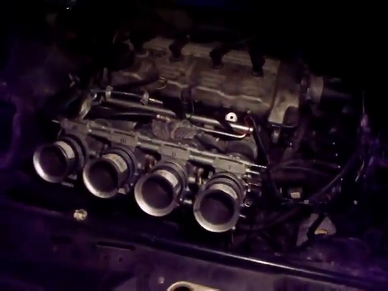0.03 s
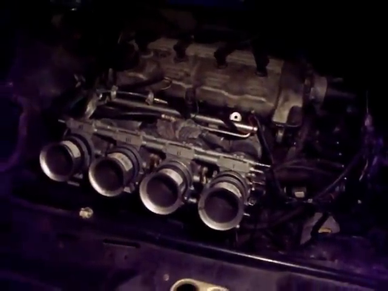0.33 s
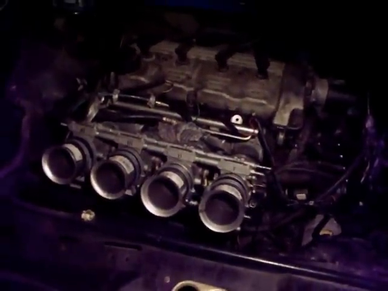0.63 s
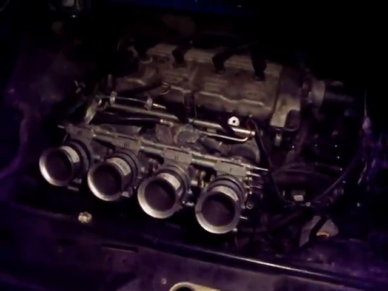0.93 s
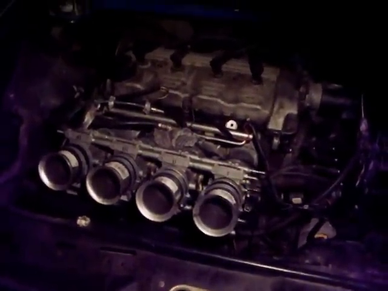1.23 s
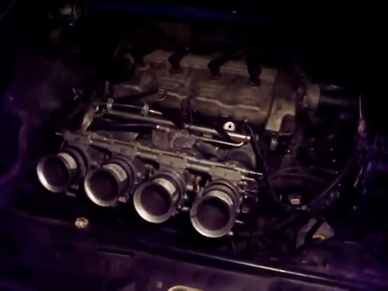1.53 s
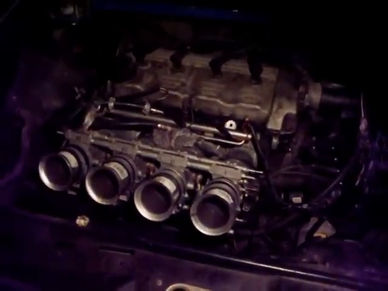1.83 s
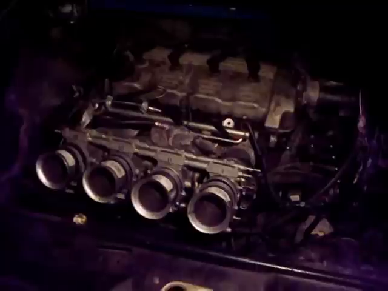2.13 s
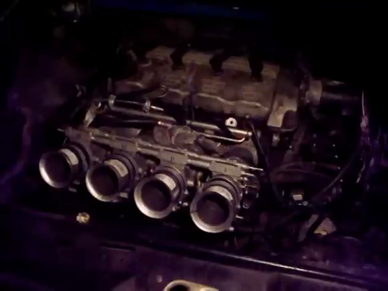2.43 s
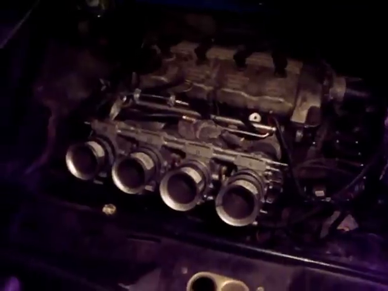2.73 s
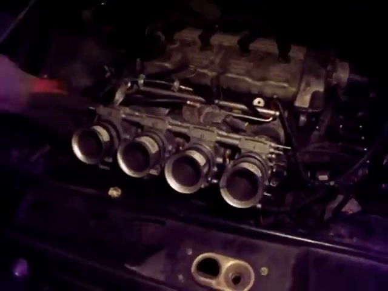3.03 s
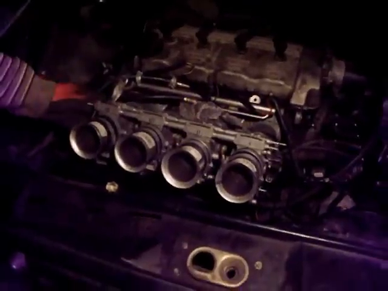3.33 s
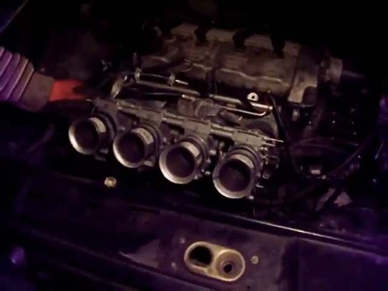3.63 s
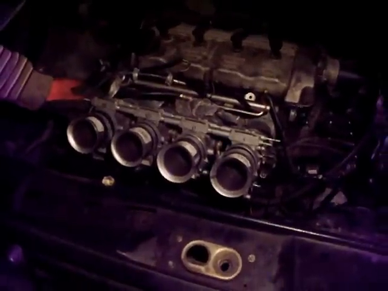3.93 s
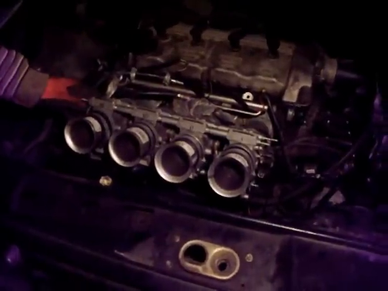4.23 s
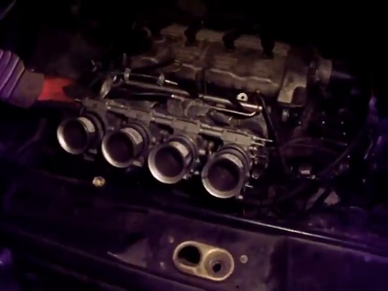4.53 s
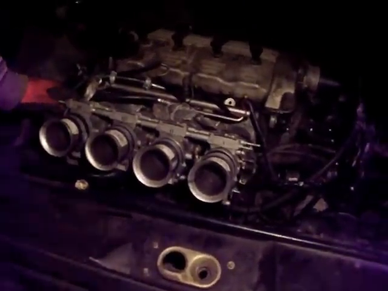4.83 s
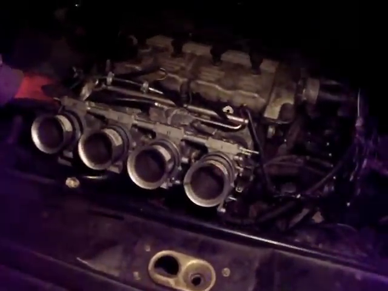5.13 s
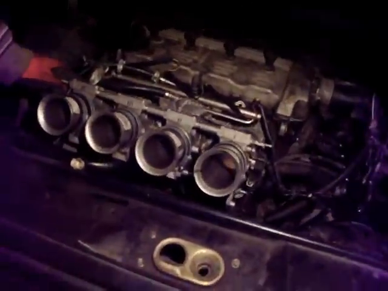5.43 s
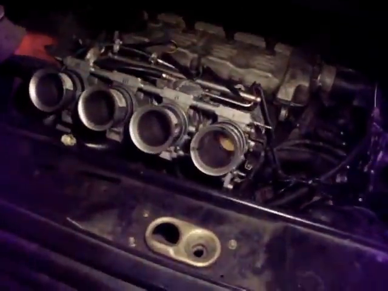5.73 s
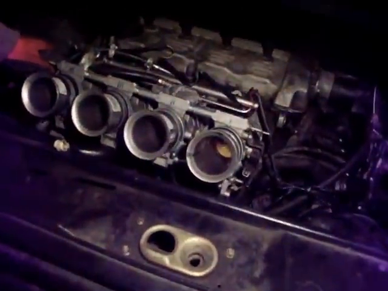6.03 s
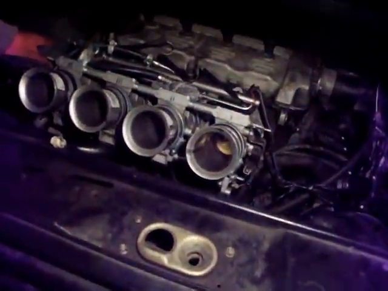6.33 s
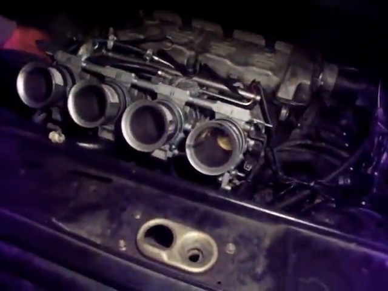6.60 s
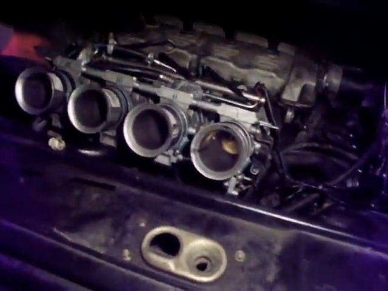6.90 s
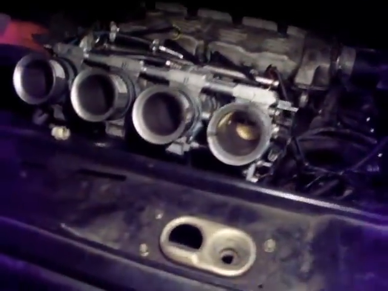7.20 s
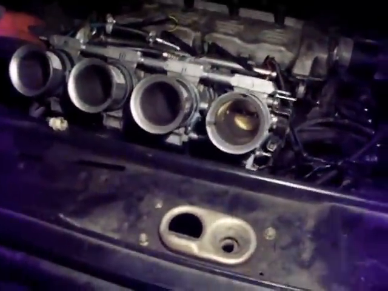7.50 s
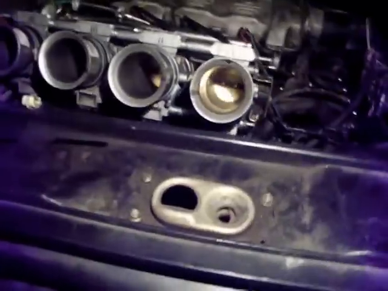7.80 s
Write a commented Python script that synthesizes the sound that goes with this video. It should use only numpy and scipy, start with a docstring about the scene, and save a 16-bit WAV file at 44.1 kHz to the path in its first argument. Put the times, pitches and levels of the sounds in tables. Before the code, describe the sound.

A four-cylinder car engine idles in a garage with a low, lumpy exhaust boom over light valve ticking. After about five seconds its open intake pipes start giving short, hollow barks. These speed up and merge into a loud, honking roar as the revs climb, overloading the dull-sounding microphone above the engine. Right at the end the throttle shuts, with a couple of low exhaust thuds.

```python
"""An engine idles and revs once

A four-cylinder engine with open intake trumpets (short flared air pipes) idles lumpily in a garage.
Firings boom in the exhaust over clattering valves. As the throttles open, each gulp of air rings a
trumpet, until the barks merge into a roar that overloads a dull-sounding microphone over the engine."""
import sys
import numpy as np
from scipy import signal
from scipy.fft import rfft, irfft, next_fast_len
from scipy.io import wavfile
from scipy.ndimage import uniform_filter1d

SR = 44100
rng = np.random.default_rng(int(sys.argv[2]) if len(sys.argv) > 2 else 0)


def wav_out(sig):
    """Save sig, one row per channel (or a flat mono array), as 16-bit PCM at SR to the path in sys.argv[1]."""
    wavfile.write(sys.argv[1], SR, np.round(np.clip(np.atleast_2d(sig).T, -1, 1) * 32767).astype(np.int16))


N = 346626
ALL_OPEN_S = 6.043  # from here on, all four throttles pass air
CLIP_LEVEL = 0.72  # the microphone overloads above this

# The cylinders in firing order:
# (exhaust level [dB], intake level [dB], trumpet pitch [Hz], ring time [s], delay of the gulp [s])
CYLINDERS = [(2.5, -0.5, 626, 0.086, 0.00048), (10.5, -3.5, 628, 0.071, 0.00076),
             (-0.5, -1.5, 635, 0.022, 0.0014), (7, -2.5, 608, 0.044, 0.0008)]


def bark(start_s, db, hz, ring_s, rasp_db, rasp_s=0.0014, attack_s=0.0013, hold_s=0.002):
    """One gulp of air rings a trumpet and rasps past the throttle; returns its place and sound."""
    # Tones of the air in a trumpet: (multiple of its pitch, level [dB], share of the ring time)
    tones = [(0.799, -10, 0.37), (1, 1, 1), (2.782, -27.5, 0.68), (3.08, -34.5, .8), (3.652, -31.5, 0.7),
             (4.953, -31, 0.59)]
    # Bands of hiss at the throttle plate: (frequency [Hz], width [Hz], level [dB])
    rasp_bands = [(1210, 420, -9), (1850, 250, 9), (2380, 230, -12.5), (3200, 600, -11.5)]
    first = int(start_s * SR)
    t = np.arange(min(SR // 8, N - first)) / SR
    pitch = hz * (1 - 0.04 * np.exp(-t / 0.0025))  # starts flat, comes up as the valve shuts
    turns = np.cumsum(pitch) / SR
    released = np.maximum(t - hold_s, 0)  # the gulp pulls for a moment before the ring fades
    ring = sum(undb(level - 60 * released / (ring_s * share)) * np.sin(2 * np.pi * multiple * turns)
               for multiple, level, share in tones)
    ring *= 1 - np.exp(-t / attack_s)
    rasp = undb(rasp_db) * unit(resonate(rng.standard_normal(len(t)), rasp_bands))
    rasp *= np.exp(-t / rasp_s) * np.minimum(t / attack_s, 1)
    return slice(first, first + len(t)), undb(db) * (ring + rasp)


def intake(fired, rate_hz, bark_db, scatter_db=0.63, jitter_s=0.00003, detune=0.005):
    """All four trumpets bark in firing order, ringing shorter as the air flows faster."""
    # Gulps that nearly fail while the throttles are barely open: (time [s], dip [dB])
    weak_gulps = [(6.207, -9), (6.455, -13)]
    strokes = fired[np.argmin(abs(fired - ALL_OPEN_S)):-1]
    chance = rng.standard_normal((len(strokes), 3))
    ring_share = (rate_hz[int(ALL_OPEN_S * SR)] / rate_hz) ** 0.4
    out = np.zeros(N)
    for stroke, (s, (late, loud, sharp)) in enumerate(zip(strokes, chance)):
        _, own_db, hz, ring_s, delay_s = CYLINDERS[stroke % len(CYLINDERS)]
        now = int(s * SR)
        weak_db = sum(dip for at, dip in weak_gulps if abs(s - at) < 0.01)
        db = bark_db[now] + own_db + weak_db + scatter_db * loud
        start_s = s + delay_s + jitter_s * late
        place, sound = bark(start_s, db, hz * (1 + detune * sharp), ring_s * ring_share[now], rasp_db=-10)
        out[place] += sound
    return out


def lone_gulps():
    """One throttle cracks open early, so its trumpet barks alone, short and uneven."""
    # One gulp per engine cycle: (time [s], level [dB])
    gulps = [(4.871, -16), (4.991, -13.5), (5.112, -16.5), (5.234, -13), (5.358, -20.5), (5.477, -13),
             (5.598, -14.5), (5.718, -9), (5.838, -6.5), (5.956, -6.5)]
    out = np.zeros(N)
    for s, db in gulps:
        place, sound = bark(s, db, hz=645, ring_s=0.05, rasp_db=-22)
        out[place] += sound
    return out


def howl(strokes, break_stroke=2.2, recover_strokes=0.3):
    """Near full throttle the air in the trumpets sings on, breaking off once per engine cycle."""
    # The sung tone: (time [s], pitch [Hz], level [dB])
    song = [(6.62, 599, -39.5), (6.74, 609, -11), (6.86, 601.4, -9), (6.93, 610.2, 0), (7.15, 621.3, 2),
            (7.33, 635, 5.5), (7.47, 624.7, -1.5), (7.53, 576.4, -6.5), (7.58, 586, 2), (7.61, 583, -16.5),
            (7.86, 572, -17)]
    pitch, db = curves(song)
    since_break = (strokes - break_stroke) % len(CYLINDERS)
    last_break = np.maximum.accumulate(np.arange(N) * (np.diff(since_break, prepend=0) < 0))
    turns = np.cumsum(pitch) / SR
    tone = np.sin(2 * np.pi * (turns - turns[last_break]))
    playing = np.arange(N) / SR > ALL_OPEN_S
    return playing * undb(db) * tone * (1 - np.exp(-since_break / recover_strokes))


def exhaust(fired, hz, opening_db, scatter_db=4.5, jitter_s=0.00091, gas_db=2.5, shake_db=6.5):
    """Puffs of burnt gas boom in the pipe: ragged when idling or coasting, even when pulling hard."""
    # Resonances of the pipe and garage: (frequency [Hz], width [Hz], level [dB])
    resonances = [(47.5, 18, 3.5), (57, 7, -11.5), (93.3, 15.2, 4.5), (113, 2.6, -11.5), (129.5, 2, -6.5),
                  (167.7, 13, -16.5), (247.4, 10.6, -0.5), (279.4, 13, -9.5)]
    late, loud = rng.standard_normal((len(fired), 2)).T
    unsteady = (hz.min() / hz) ** 3 + coasting(hz, opening_db)
    ragged = unsteady[(fired * SR).astype(int)]
    cylinder_db = np.resize(np.array(CYLINDERS)[:, 0], len(fired))
    sizes = undb(ragged * (cylinder_db + scatter_db * loud))
    puffs = strikes(fired + jitter_s * ragged * late, sizes, decay_s=0.003)
    gas = undb(gas_db) * unsteady * rng.standard_normal(N)
    shake = undb(shake_db) * np.sqrt(unsteady) * rattle(fired, decay_s=0.018)
    pipe = resonate(unit(puffs) + gas + shake, resonances)
    # the silencer takes out the treble, and the open end gives off little deep bass
    pipe = signal.sosfilt(signal.butter(2, [21, 400], "band", fs=SR, output="sos"), pipe)
    return even(garage(pipe, wet_db=7.5))


def exhaust_level(hz, opening_db, boom_hz=53, boom_width_hz=19.4, stumble_s=0.08):
    """Level in dB: the pipe booms when the firing rate meets its resonance, and burbles on coasting."""
    # Weak firings that make the idle stumble: (time [s], dip [dB])
    stumbles = [(.74, -5.5), (1.3, -4), (2.98, -3.5), (3.32, -2)]
    t = np.arange(N) / SR
    smoothing_db = -1.5 * np.log2(hz / hz.min())  # the pipe smooths puffs that crowd together
    boom_db = 16.5 * np.exp(-((hz - boom_hz) / boom_width_hz) ** 2)
    burble_db = 6 * coasting(hz, opening_db)
    dips_db = sum(db * np.exp(-((t - s) / stumble_s) ** 2) for s, db in stumbles)
    return -23 + smoothing_db + boom_db + burble_db + dips_db


def air_rush(fired, leak=0.2):
    """Swirling air comes in a spurt with each stroke, over the snarl of the shaking engine."""
    # Tone colour of the rushing air: (frequency [Hz], level [dB])
    spectrum = [(60, -2), (150, -4.5), (300, -10), (460, 6), (600, 10), (780, 2.5), (1200, -5),
                (1450, -12.5), (1900, -7.5), (2500, -15), (3200, -29.5), (4200, -27.5)]
    air = unit((leak + strikes(fired, 1, decay_s=0.005)) * rng.standard_normal(N))
    return unit(colour(0.5 * air + rattle(fired, decay_s=0.007), spectrum))


def drone(strokes, hz, count=18, lowest_tone_db=-11):
    """Pure tones at multiples of the firing rate swell as they pass the engine bay's resonances."""
    # Resonances of the engine bay: (frequency [Hz], width [Hz], level [dB])
    resonances = [(68, 14, 6.5), (105.1, 15, 6), (151, 40, -5.5), (222.6, 30, -6), (284, 27, -5),
                  (350, 41, -10.5), (507, 45, 0.5), (580, 32, -1.5), (689, 50, -1.5), (1010, 500, -20),
                  (1056, 32, -9.5)]
    f = np.arange(count * hz.max())
    response = sum(undb(db) / (1 + (2 * (f - centre) / width) ** 2) for centre, width, db in resonances)
    upper = np.clip((f - 300) / 200, 0, 1)  # tones above about 400 Hz grow faster with speed
    growth = undb(9 * np.log2(hz / hz.max()))
    out = np.zeros(N)
    for k in range(1, count + 1):
        at = np.minimum((k * hz).astype(int), len(f) - 1)
        gain = undb(lowest_tone_db * (k == 1)) * response[at] * (1 + upper[at] * (growth - 1))
        out += gain * np.sin(2 * np.pi * (k * strokes + rng.random()))
    return out


def thrash(fired, hz, top_db=-11.5, db_per_octave=17):
    """Pistons and valve gear snarl at speed, whether the throttle is open or shut."""
    # Tone colour of the moving parts: (frequency [Hz], level [dB])
    spectrum = [(60, -1.5), (200, -7.5), (290, 4), (400, -7.5), (500, -4.5), (590, 10), (700, 1.5),
                (1060, -3), (1220, -5.5), (1500, -13), (2000, -4), (2500, -9), (3100, -21), (4200, -23)]
    snarl = rattle(fired, decay_s=0.016) + undb(-3) * rng.standard_normal(N)
    return unit(colour(snarl, spectrum)) * undb(top_db + db_per_octave * np.log2(hz / hz.max()))


def clatter(fired, knock_db=-24.5, tick_db=-5, shake_db=-7):
    """Chain and belts hiss, each firing knocks, and the valves tick in between."""
    # Tone colour of the valve gear and belts: (frequency [Hz], level [dB])
    spectrum = [(90, -21.5), (200, -16.5), (270, 2.5), (345, -5), (430, -2), (620, -5.5), (1080, -11),
                (1350, -22.5), (1600, -16.5), (1850, -14), (2300, -16.5), (2700, -20), (3600, -20.5),
                (4200, -29)]
    knocks = strikes(fired, undb(1.8 * rng.standard_normal(len(fired))), decay_s=0.016)
    count = 4 * len(fired)  # four ticks per firing
    tick_times = np.interp(np.arange(count) / 4, np.arange(len(fired)), fired)
    tick_times += 0.0035 * rng.standard_normal(count)
    ticks = strikes(tick_times, undb(-3 * rng.standard_normal(count)), decay_s=0.005)
    hiss = unit((1 + undb(knock_db) * knocks + undb(tick_db) * ticks) * rng.standard_normal(N))
    return unit(colour(hiss + undb(shake_db) * rattle(fired, decay_s=0.066), spectrum))


def rattle(fired, decay_s):
    """Each cylinder shakes the engine in its own way, the same on every cycle: a rough buzz."""
    t = np.arange(SR // 10) / SR
    count = len(CYLINDERS)
    shakes = rng.standard_normal((count, len(t))) * np.exp(-t / decay_s)
    kicks = [strikes(fired[k::count], 1, 1 / SR) for k in range(count)]
    return even(sum(signal.oaconvolve(kick, shake)[:N] for kick, shake in zip(kicks, shakes)))


def thuds(hz=69, attack_s=0.005, decay_s=0.027):
    """Unburnt fuel goes off after the throttle shuts, swinging the air in the pipe a few times."""
    # Thuds in the exhaust: (time [s], level [dB])
    afterfires = [(7.621, -6.5), (7.831, -8)]
    s, db = np.transpose(afterfires)
    t = np.arange(SR // 5) / SR
    swing = np.sin(2 * np.pi * hz * t) * np.exp(-t / decay_s) * (1 - np.exp(-t / attack_s))
    return signal.oaconvolve(strikes(s, undb(db), 1 / SR), swing)[:N]


def pulley(strokes, turns_per_firing=1.62):
    """A deep hum, perhaps an unbalanced pulley, throbs against the firings at idle."""
    # Loudness of the hum: (time [s], level [dB])
    levels = [(0, -23.5), (1.2, -26.5), (1.7, -34), (2.5, -16.5), (3, -24), (3.5, -26.5), (4.1, -16.5),
              (4.6, -19.5), (4.95, -36.5), (6, -60.5)]
    db, = curves(levels)
    return undb(db) * np.sin(2 * np.pi * (turns_per_firing * strokes + rng.random()))


def garage(x, wet_db, echo_s=0.91):
    """The direct sound plus a short wash of echoes from the walls."""
    t = np.arange(SR // 2) / SR
    tail = rng.standard_normal(len(t)) * undb(-60 * t / echo_s) * (t > 0.008)
    return x + undb(wet_db) * signal.fftconvolve(x, tail / np.linalg.norm(tail))[:N]


def overload_whistle(clipped, clock_hz=8000):
    """In a long overload, copies of the honk whistle beside the converter's clock rate and its double."""
    overload = uniform_filter1d(1. * (abs(clipped) >= CLIP_LEVEL), SR // 10) ** 2
    honk = resonate(clipped, [(625, 90, 0)])
    clock = 2 * np.pi * clock_hz * np.arange(N) / SR
    copies = honk * overload * (undb(-20) * np.cos(clock) + undb(-26) * np.cos(2 * clock))
    return colour(copies, [(7400, 0), (8600, -7)])  # strongest just below the clock rate


def coasting(hz, opening_db):
    """Near 1 when the throttle is shut at high speed, else near 0."""
    return np.clip(1 - undb(opening_db), 0, 1) * (hz / hz.max()) ** 4


def intake_level(hz, opening_db, top_db, per_db, per_octave):
    """Level in dB: top_db when wide open at top speed, changing with throttle and speed."""
    return top_db + per_db * opening_db + per_octave * np.log2(hz / hz.max())


def undb(db):
    """Turn decibels into a gain."""
    return 10 ** (np.asarray(db) / 20)


def curves(rows):
    """Each column of a table, joined by straight lines in time."""
    s, *columns = np.transpose(rows)
    return [np.interp(np.arange(N) / SR, s, c) for c in columns]


def unit(x):
    """Scale to an average strength (rms) of 1."""
    return x / np.sqrt(np.mean(x ** 2))


def even(x):
    """Hold the strength near 1 over about a fifth of a second."""
    return x / np.sqrt(uniform_filter1d(uniform_filter1d(x ** 2, SR // 5), SR // 10) + 1e-12)


def resonate(x, bands):
    """Ring x through resonances: (frequency [Hz], width [Hz], level [dB])."""
    return sum(undb(db) * signal.lfilter(*signal.iirpeak(hz, hz / width, SR), x)
               for hz, width, db in bands)


def colour(x, points):
    """Filter x along a curve of points: (frequency [Hz], level [dB])."""
    hz, db = np.transpose(points)
    size = next_fast_len(N)
    f = np.maximum(np.fft.rfftfreq(size, 1 / SR), 1)
    gain = undb(np.interp(np.log(f), np.log(hz), db))
    return irfft(rfft(x, size) * gain, size)[:N]


def strikes(times, sizes, decay_s):
    """A sudden push at each time, which then dies away."""
    x = np.zeros(N)
    np.add.at(x, np.clip((times * SR).astype(int), 0, N - 1), sizes)
    return signal.lfilter([1], [1, -np.exp(-1 / (decay_s * SR))], x)


def scene():
    """Engine speed times the firings; speed and throttle set the levels of the main sources."""
    # Engine speed: (time [s], firing rate [Hz])
    speed = [(0, 28), (1.4, 27.8), (2.2, 29.2), (3.3, 28.1), (4.4, 30.4), (4.9, 32.84), (5.7, 33.18),
             (6.07, 34.68), (6.37, 45.83), (6.77, 58.34), (7.42, 94.5), (7.55, 96.8), (7.86, 92.6)]
    # The hand on the throttle: (time [s], opening [dB, about 0 is wide open])
    throttle = [(4.1, -38.5), (4.9, -19), (5.48, -17), (5.83, -15.5), (6.05, -15), (6.28, -8.5),
                (6.55, -7.5), (6.84, 1.5), (6.92, 4), (7.38, 1.5), (7.5, 0), (7.58, -2), (7.61, -8.5),
                (7.86, -19)]
    hz, = curves(speed)
    opening_db, = curves(throttle)
    all_open = int(ALL_OPEN_S * SR)
    strokes = np.cumsum(hz) / SR
    strokes -= strokes[all_open]  # count from the moment all four throttles open
    fired = np.flatnonzero(np.diff(np.floor(strokes))) / SR  # firing times [s]
    boom = exhaust(fired, hz, opening_db) * undb(exhaust_level(hz, opening_db))
    valves = clatter(fired) * undb(-31) * (hz / hz.min()) ** 1.23  # louder as they move faster
    barks = intake(fired, hz, intake_level(hz, opening_db, top_db=2, per_db=0.58, per_octave=-2.7))
    honk = garage(barks + howl(strokes) + lone_gulps(), wet_db=-20)
    air = air_rush(fired) * undb(intake_level(hz, opening_db, top_db=-4.5, per_db=1, per_octave=6.34))
    hum_db = intake_level(hz, opening_db, top_db=-7.5, per_db=0.51, per_octave=4.22)
    hum = drone(strokes, hz) * undb(hum_db)
    roar = (air + hum) * undb(-8 * (np.arange(N) < all_open))  # quieter until all throttles pass air
    return (boom + thuds() + pulley(strokes) + valves + thrash(fired, hz) + roar + honk)[None]


def record(dry, mic_hz=4150, top_hz=15900):
    """The microphone passes little treble; what lies above its range comes from overload."""
    narrow = signal.sosfilt(signal.ellip(8, 0.5, 80, mic_hz, fs=SR, output="sos"), dry)
    clipped = np.clip(narrow[0], -CLIP_LEVEL, CLIP_LEVEL)
    dulled = colour(clipped + overload_whistle(clipped), [(3300, 0), (4800, -8), (8000, -4.5), (14000, -11)])
    return signal.sosfilt(signal.ellip(8, 0.2, 70, top_hz, fs=SR, output="sos"), dulled)[None]


dry = scene()
out = record(dry)
wav_out(out)
```